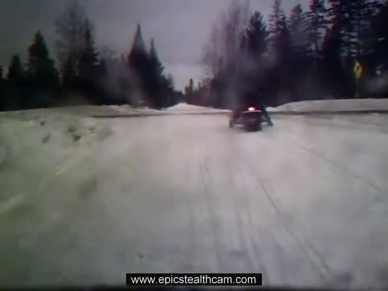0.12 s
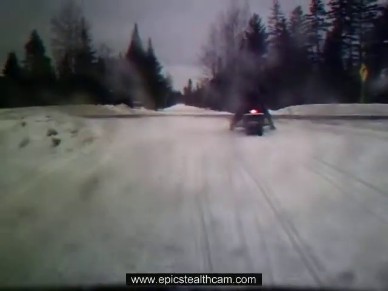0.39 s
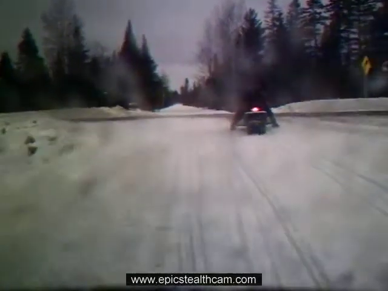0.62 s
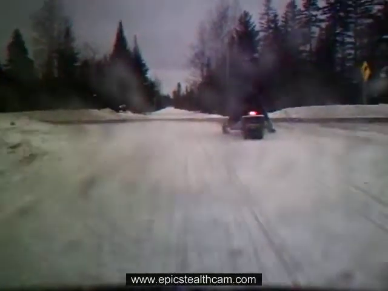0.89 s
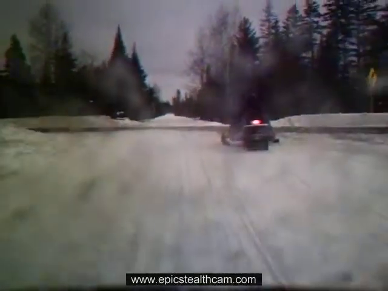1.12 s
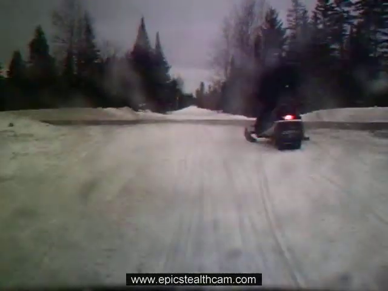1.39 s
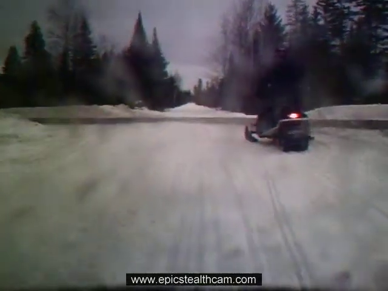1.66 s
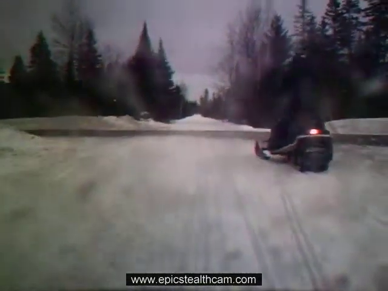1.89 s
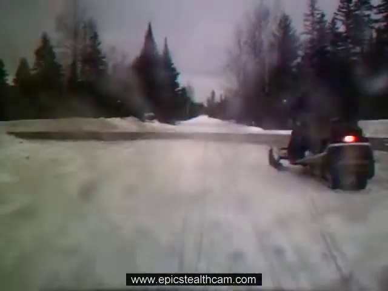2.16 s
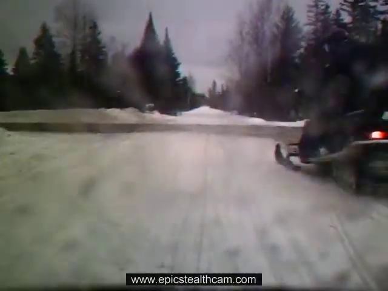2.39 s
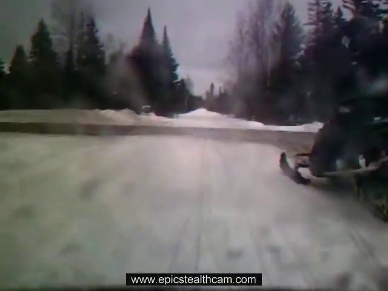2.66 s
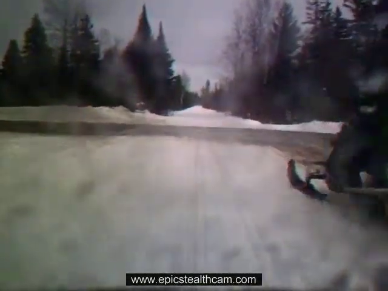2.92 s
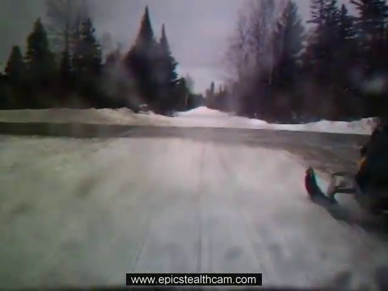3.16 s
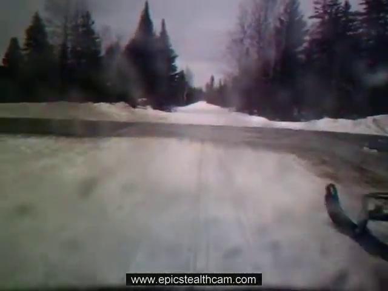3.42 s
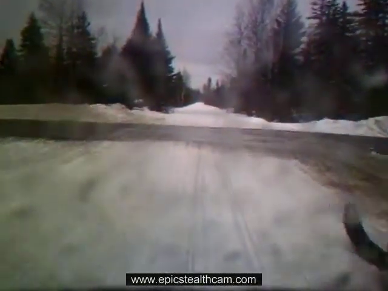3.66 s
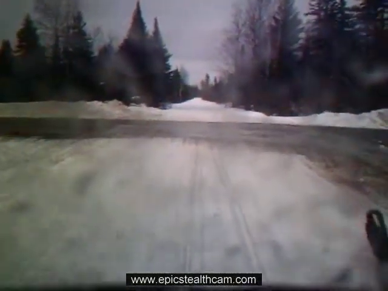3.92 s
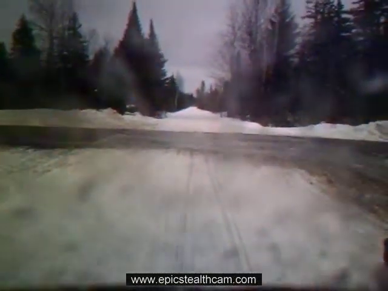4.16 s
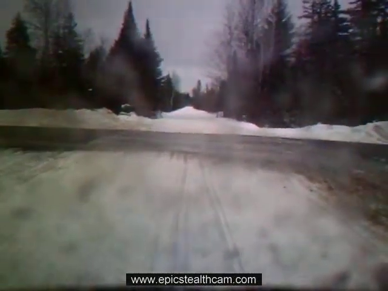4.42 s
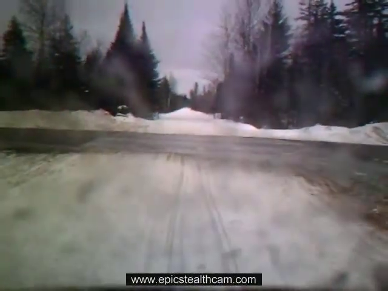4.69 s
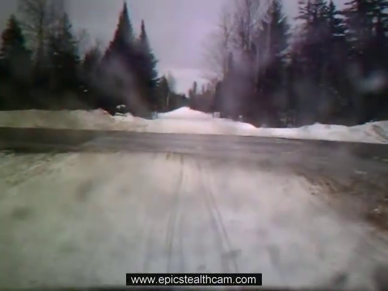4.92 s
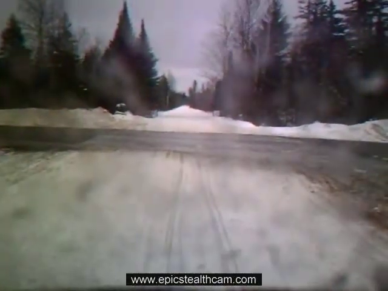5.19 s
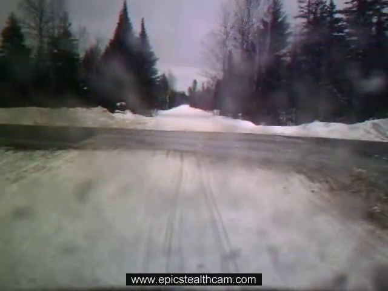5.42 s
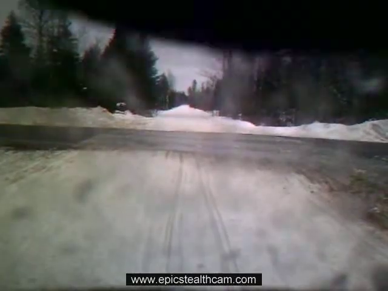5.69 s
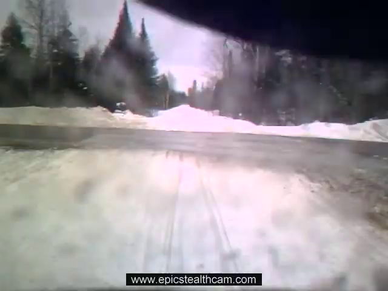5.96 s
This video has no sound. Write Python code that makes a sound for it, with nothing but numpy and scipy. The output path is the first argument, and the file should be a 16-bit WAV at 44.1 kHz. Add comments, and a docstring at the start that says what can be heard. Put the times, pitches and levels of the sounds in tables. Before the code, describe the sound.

Close, clipped, band-limited sound on a moving snowmobile: buzzing engine, grainy track roar and a metallic singing panel. The pitch sags, flares sharply for a moment, then slides down into slow uneven putting. Loose parts click and clatter, most densely as it slows. Another sled's uneven throb joins it, its low end swelling as they rest side by side on a snowy trail, both idling to the end.

```python
"""Aboard a two-stroke snowmobile: it slows, blips the throttle and drops to a lumpy idle beside a second sled.
Periodic firings excite the resonances of pipe and body, noise pulsed by them makes the roar, and a hood sings.
The second sled is a loping sum of harmonics and clatter whose bass grows as it draws alongside;
short noise bursts through two resonances are loose parts. The microphone chain overloads and keeps a telephone band."""
import sys
import numpy as np
from scipy import signal
from scipy.fft import rfft, irfft, next_fast_len
from scipy.io import wavfile
from scipy.ndimage import uniform_filter1d

SR = 44100
rng = np.random.default_rng(int(sys.argv[2]) if len(sys.argv) > 2 else 0)


def persist_wave(psi):
    """Save psi, clipped to +-1, as 16-bit WAV."""
    counts = np.round(np.clip(psi, -1, 1) * 32767).astype(np.int16)
    wavfile.write(sys.argv[1], SR, np.atleast_2d(counts).T)


def level_to_linear(level):
    """Convert decibel levels to linear amplitude factors, elementwise."""
    exponent = np.asarray(level, float) / 20
    return 10 ** exponent


N = 267687  # samples

# Course of the own engine. Each row: time in seconds, crank rate in Hz, throttle effort in dB,
# level of the evenly timed firings over their usual share in dB.
OWN_RIDE = [(0.0, 71.32, 1, 2), (0.2, 71.75, 0.5, -4), (0.5, 69.96, 0, -1.5), (0.9, 67.95, 0.5, -1.5),
            (1.3, 64.97, 0.5, -0.5), (1.62, 63.31, -3, 5), (1.72, 65.58, -2, 0.5), (1.87, 87.46, 0, 0),
            (1.96, 99.0, 0.5, 5.5), (2.0, 98.5, -0.5, 6.5), (2.27, 82.5, -0.5, 1), (2.57, 66.2, -2, -7),
            (2.8, 57.2, -2.5, -0.5), (3.03, 49.1, -1.5, -4.5), (3.35, 41.43, -1, -3),
            (3.62, 32.41, 0.5, -4), (4.22, 31.03, 0, -2.5), (4.47, 29.29, -1, -1.5), (5.05, 29, -1.5, 2),
            (5.2, 30.1, -1.5, 2), (5.6, 30.33, -0.5, 5.5), (6.07, 30.26, -0.5, 5.5)]
# Brief dips of the crank shake. Each row: centre in seconds, time to 1/e of the dip in seconds, depth in dB.
SHAKE_DIPS = [(0.809, 0.028, -2.5), (2.817, 0.057, -6), (2.968, 0.075, -5.5), (3.145, 0.034, -5)]
# Exhaust and body resonances. Each row: centre in Hz, width in Hz, relative level under way in dB, at idle in dB.
PIPE_RESONANCES = [(62.25, 26, -10, -6.5), (89.25, 21.4, -11, -2.5), (114.9, 28.3, -22.5, -2),
                   (150.8, 17.8, -13, 0), (242.1, 17.1, -4, -5), (304.2, 54.2, 2, -3), (430, 88, -5, -8.5),
                   (580, 44, -4, -14.5), (720, 250, -12.5, -26)]
# Spectrum of track and clutch roar. Each row: frequency in Hz, relative density in dB.
ROAR_SPECTRUM = [(15, -54), (25, -16), (69, 4.5), (120, -6.5), (213, -5), (306, -4), (592, -14.5),
                 (867, -32.5), (964, -15), (1050, -30.5), (2970, -37.5), (4000, -38), (5200, -77),
                 (8800, -120)]
# Approach of the second sled. Each row: time in seconds, firing rate in Hz,
# how far it has come alongside from 0 to 1, relative level in dB.
SECOND_SLED = [(2.3, 65.2, 0.05, -7.5), (2.6, 63.69, .05, 2), (2.93, 63.99, .08, 2), (3.5, 64.54, 0.2, 0.5),
               (4.05, 64.53, .6, 0), (4.7, 63.96, .85, -1.5), (5.2, 63.88, .95, 1.5),
               (5.6, 63.23, .98, -0.5), (6.07, 63.61, 1, 1)]
# Its 2nd to 5th harmonics. Each row: relative level while ahead in dB, alongside in dB.
HARMONICS = [(-21, -17), (-23, -10), (-25.5, -20.5), (-12.5, -28.5)]
# Spectrum of its clatter. Each row: frequency in Hz, relative density in dB.
CLATTER_SPECTRUM = [(24, -39.5), (40, -12), (85, -4), (194, 2), (235, -3.5), (571, -24), (961, -37),
                    (1140, -33), (3430, -52), (4000, -53), (5200, -88.5), (8800, -120)]
# Clearest knocks of loose parts. Each row: start in seconds, peak before the preamplifier in dB, upper ring in Hz.
KNOCKS = [(0.0462, -23, 3040), (0.561, -17.5, 2960), (0.619, -14, 3340), (0.8256, -17, 3320),
          (0.9304, -21, 3300), (1.6527, -18, 2816), (2.6302, -16.5, 2850), (3.1597, -22.5, 3300),
          (3.243, -22.5, 2850), (3.2834, -20.5, 2750), (3.3527, -23.5, 2989), (3.397, -23.5, 3240),
          (3.437, -23.5, 3164), (3.454, -17, 3300), (3.467, -17, 3350), (3.5289, -17.5, 3310),
          (3.543, -18, 3350), (3.5541, -18.5, 3260), (3.671, -27, 2800), (3.8103, -22.5, 2990),
          (3.9958, -19, 2940), (4.044, -23.5, 3130), (4.0932, -24, 2860)]

# layers of the own engine: dB under way, dB at idle (both at zero effort), dB change per dB of effort
SHAKE, ROUGH, EVEN, GEAR = (-6, -24.5, 0.22), (-13.5, -15, 1.1), (-14, -16.5, 0.72), (-26, -33.5, 1.5)
IDLE_HZ, UNDER_WAY_HZ = 31.3, 55.8  # crank rates
WEAK_CYLINDER_DB = -13, -7.5  # under way, at idle
SHAKE_SAG_DB_S, SHAKE_WAVER_DB = 1, 1.4  # the shake weakens as the sled coasts down

LOPE_DEPTH = 0.7, 0.2  # ahead, alongside (0-1)
LOPE_FIRINGS, LOPE_WANDER = 5.8, 0.38  # firings to a lope; how far its beat strays, in lopes
LOPE_START, LOPE_TIMING = 0.3, 0.056  # share of a lope, share of a firing
HUM_WAVER_DB, HUM_WAVER_PER_S = 2.5, 9
CLATTER_DB = -32.5, -43.5  # ahead, alongside

HOOD_HZ, HOOD_WANDER_HZ, HOOD_WIDTH_HZ = 968, 6, 72
HOOD_DB, HOOD_WAVER_DB, HOOD_SWELL_DB_S = -26, 1.9, 1.5
HOOD_FULL_S, HOOD_RISE_DB_S, HOOD_FADES_S, HOOD_FALL_DB_S = 0.4, 20, 2.16, 16.5

RATTLE_LOW_HZ, RATTLE_T60_S = 1640, 0.035
RATTLE_LOW_DB, RATTLE_LOW_SPREAD_DB = 1.5, 6  # lower resonance against the upper
# fainter knocks, until the sled rests
LOOSE_COUNT, LOOSE_UNTIL_S = 14, 4.1
LOOSE_DB, LOOSE_SPREAD_DB, LOOSE_HZ, LOOSE_SPREAD_HZ = -25, 4, 2850, 200

RUMBLE_DB = -22.5
DRIVE_DB, COUPLING_HZ, BAND_TOP_HZ = 3, 82, 3890
PREAMP_TOP, FULL_SCALE = 0.69, 0.709  # clipping amplitudes
SAMPLING = 80, 441  # ratio of 8 kHz to SR


def level(x, db):
    """The rms value sets the level of a signal."""
    return x * level_to_linear(db) / np.sqrt(np.mean(x ** 2))


def columns(table):
    """Linear interpolation in time turns each table column into a value per sample."""
    s, *rest = np.transpose(table)
    return [np.interp(np.arange(N) / SR, s, column) for column in rest]


def band(x, hz, width):
    """A two-pole resonance has gain 1 at its centre."""
    return signal.lfilter(*signal.iirpeak(hz, hz / width, fs=SR), x)


def walk(rate):
    """Random levels held 1 / rate s and twice averaged give a slow fluctuation with spread near 1."""
    hold = int(SR / rate)
    steps = np.repeat(rng.standard_normal(N // hold + 1), hold)
    return 0.795 * uniform_filter1d(uniform_filter1d(steps, hold), hold)[:N]


def colour(x, points):
    """Spectral weighting gives white noise the density of (Hz, dB) points, joined over log frequency."""
    hz, db = np.transpose(points)
    size = next_fast_len(N)
    f = np.maximum(np.arange(size // 2 + 1) * SR / size, 1)
    gain = level_to_linear(np.interp(np.log(f), np.log(hz), db))
    return irfft(rfft(x, size) * gain, size)[:N]


def own_engine():
    """Periodic excitation: the crank shakes, two cylinders fire into the pipe, and each firing pulses the roar."""
    hz, effort_db, steady_db = columns(OWN_RIDE)
    t = np.arange(N) / SR
    idling = np.clip((UNDER_WAY_HZ - hz) / (UNDER_WAY_HZ - IDLE_HZ), 0, 1)
    shake_db, rough_db, even_db, roar_db = (fast + (idle - fast) * idling + share * effort_db
                                            for fast, idle, share in (SHAKE, ROUGH, EVEN, GEAR))
    turns = np.cumsum(hz) / SR
    shake_db += sum(db * np.exp(-((t - s) / length) ** 2) for s, length, db in SHAKE_DIPS)
    shake_db += SHAKE_WAVER_DB * walk(18) - SHAKE_SAG_DB_S * t
    shake = np.sqrt(2) * level_to_linear(shake_db) * np.sin(2 * np.pi * turns + 0.045 * walk(7))

    # two firings a turn, every other one from the weak cylinder
    at = np.flatnonzero(np.diff(np.floor(2 * turns)))
    chance = rng.standard_normal((2, len(at)))
    fast_db, idle_db = WEAK_CYLINDER_DB
    weak_db = fast_db + (idle_db - fast_db) * idling[at]
    size = level_to_linear(weak_db * (np.arange(len(at)) % 2)) / np.sqrt(hz[at])
    even, uneven = np.zeros((2, N))
    even[at] = size * level_to_linear(1.0 * chance[0])
    # charges differ in strength and timing from one firing to the next
    late = (0.04 * chance[0] * SR / hz[at]).astype(int)
    uneven[np.clip(at + late, 0, N - 1)] = size * level_to_linear(5.3 * chance[1])

    puff = 0.46 + np.exp(-(2 * turns % 1) / 0.84)
    gas = level(uneven, -4.5) + level(puff * rng.standard_normal(N), 0)
    rough_pipe = ring_pipe(gas, idling) * level_to_linear(rough_db + 1.0 * walk(12))
    even_pipe = ring_pipe(even, idling) * level_to_linear(even_db + steady_db)
    grit = puff * level_to_linear(2.1 * walk(15) + 2.0 * walk(45)) * rng.standard_normal(N)
    roar = level(colour(grit, ROAR_SPECTRUM), 15.95) * level_to_linear(roar_db)
    return shake + rough_pipe + even_pipe + roar


def ring_pipe(x, idling):
    """Modal summation: exhaust and body resonances, neighbours in opposite phase, change balance toward idle."""
    rings = np.zeros(N)
    for k, (hz, width, fast_db, idle_db) in enumerate(PIPE_RESONANCES):
        gain = level_to_linear(fast_db + (idle_db - fast_db) * idling) / np.sqrt(width)
        rings += (-1) ** k * gain * band(x, hz, width)
    return level(rings, 0)


def second_sled():
    """Joint amplitude and phase modulation makes firing harmonics lope; each firing also pulses clatter."""
    hz, beside, level_db = columns(SECOND_SLED)
    beside = np.clip(beside, 0, 1)

    def blend(ahead, along):
        """Linear interpolation follows the approach."""
        return ahead + (along - ahead) * beside

    lope = np.clip(blend(*LOPE_DEPTH), 0, 1)
    steady = np.cumsum(hz) / SR
    throb = 2 * np.pi * (steady / LOPE_FIRINGS + LOPE_START + LOPE_WANDER * walk(4))
    # strong charges come slowly and weak ones hurry, so strength and timing swing together
    firings = steady - LOPE_TIMING * lope * np.sin(throb) + 0.015 * walk(15)
    lumps = (1 + lope * np.cos(throb)) * level_to_linear(0.12 * walk(14))
    fade_in = np.clip((np.arange(N) / SR - SECOND_SLED[0][0]) / 0.5, 0, 1)
    hum = np.zeros(N)
    for k, db in enumerate(HARMONICS):
        gain = np.sqrt(2) * level_to_linear(blend(*db) + HUM_WAVER_DB * walk(HUM_WAVER_PER_S))
        hum += gain * np.cos(2 * np.pi * (k + 2) * firings + 0.55 * k)
    puff = 1.3 + np.exp(-(firings % 1) / 0.5)
    clatter = level(colour(puff * rng.standard_normal(N), CLATTER_SPECTRUM), 10.6) * level_to_linear(blend(*CLATTER_DB))
    return fade_in * level_to_linear(level_db) * lumps * (hum + clatter)


def hood():
    """Panel resonance: tone and narrow-band hiss at one pitch set in, swell and fade as the track slows."""
    t = np.arange(N) / SR
    db = HOOD_DB + HOOD_SWELL_DB_S * t + HOOD_WAVER_DB * walk(6.3)
    db -= HOOD_RISE_DB_S * np.maximum(HOOD_FULL_S - t, 0)
    db -= HOOD_FALL_DB_S * np.maximum(t - HOOD_FADES_S, 0)
    turns = np.cumsum(HOOD_HZ + HOOD_WANDER_HZ * walk(8)) / SR
    tone = np.sqrt(2) * np.sin(2 * np.pi * turns + 0.5 * walk(25))
    hiss = level(band(rng.standard_normal(N), HOOD_HZ, HOOD_WIDTH_HZ), -2.5)
    return level_to_linear(db) * (tone + hiss)


def rattles():
    """Impact excitation: each knock is a decaying noise burst through a broad upper and a lower resonance."""
    out, t = np.zeros(N), np.arange(2000) / SR
    fade = np.exp(-np.log(1000) * t / RATTLE_T60_S) * np.minimum(t / 0.00041, 1)
    loose = [(LOOSE_UNTIL_S * rng.random(),
              LOOSE_DB + LOOSE_SPREAD_DB * rng.standard_normal(),
              LOOSE_HZ + LOOSE_SPREAD_HZ * rng.standard_normal()) for _ in range(LOOSE_COUNT)]
    for s, db, hz in list(KNOCKS) + loose:
        grit = fade * rng.standard_normal(len(t))
        low_db = RATTLE_LOW_DB + RATTLE_LOW_SPREAD_DB * rng.standard_normal()
        ring = band(grit, hz, 480) + level_to_linear(low_db) * band(grit, RATTLE_LOW_HZ, 600)
        i = int(s * SR)
        out[i:i + len(t)] += (level_to_linear(db) * ring / np.abs(ring).max())[:N - i]
    return out


def rumble():
    """Broad resonance of random excitation: the frame shudders at low frequency."""
    shudder = band(band(rng.standard_normal(N), 49, 45), 35, 60)
    return level(shudder * level_to_linear(2.2 * walk(3.7)), RUMBLE_DB)


def scene():
    """Linear superposition of all sources at the microphone."""
    return (own_engine() + second_sled() + hood() + rattles() + rumble())[None]


def low_pass(x):
    """Removes everything above the highest recorded frequency."""
    return signal.sosfilt(signal.butter(12, 15900, fs=SR, output="sos"), x)


def record(dry):
    """Amplitude limiting: the preamp clips, a coupling capacitor tilts the flat tops, the 8 kHz samples clip
    at full scale and so does the ripple left by playing them at a higher rate."""
    hot = np.clip(dry * level_to_linear(DRIVE_DB), -PREAMP_TOP, PREAMP_TOP)
    tilted = signal.lfilter(*signal.butter(1, COUPLING_HZ, "high", fs=SR), hot)
    narrow = signal.sosfilt(signal.butter(10, BAND_TOP_HZ, fs=SR, output="sos"), tilted)
    low_rate = np.clip(signal.resample_poly(narrow, *SAMPLING, axis=1), -FULL_SCALE, FULL_SCALE)
    full = signal.resample_poly(low_rate, *SAMPLING[::-1], axis=1, window=("kaiser", 7.5))[:, :N]
    full = np.pad(full, ((0, 0), (0, N - full.shape[1])))
    mix = np.clip(full, -FULL_SCALE, FULL_SCALE)
    return low_pass(mix)


dry = scene()
out = record(dry)
persist_wave(out)
```